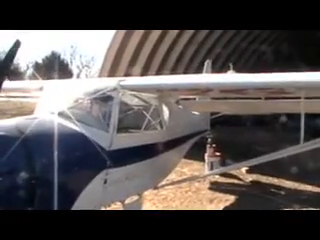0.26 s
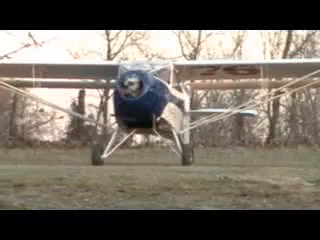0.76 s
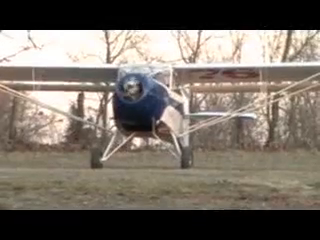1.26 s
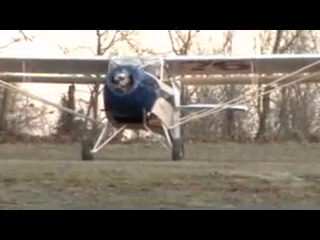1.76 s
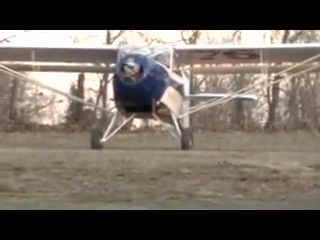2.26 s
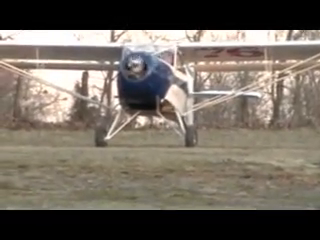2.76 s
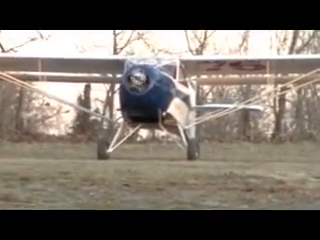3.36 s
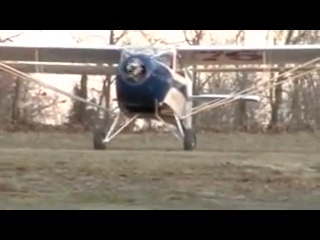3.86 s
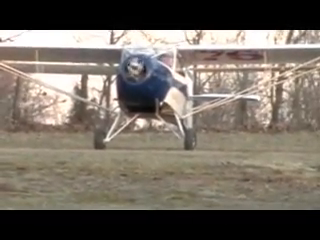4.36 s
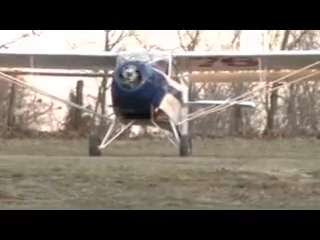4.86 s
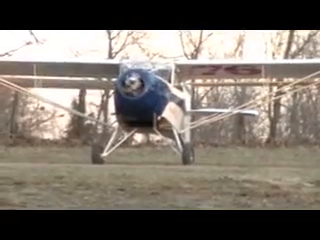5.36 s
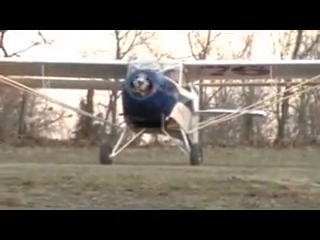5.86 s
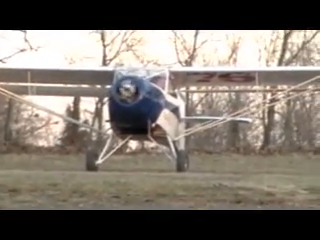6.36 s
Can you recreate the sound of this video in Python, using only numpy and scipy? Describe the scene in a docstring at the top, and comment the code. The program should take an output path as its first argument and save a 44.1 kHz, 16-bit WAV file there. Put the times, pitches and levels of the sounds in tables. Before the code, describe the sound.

Stereo outdoor sound on a grass strip. First under a second of quiet, low engine rumble and two small handling clicks. It cuts to nothing for an instant, then a loud, steady propeller drone begins abruptly, rough and throbbing, with gritty valve clatter and rushing air. The pitch eases down early, stays level, and rises slightly toward the end while a lower second drone sinks.

```python
"""Light aircraft on a grass strip

First an engine idles softly farther off in an open field, with two small clicks close by. After a moment of
silence the aircraft is heard head-on and much louder: it eases back, then slowly picks up. Four-cylinder firing
and a geared three-blade propeller are sums of harmonics of one crankshaft; torn air and valve clatter are gated
noise, the gears whine as tones, panels and a whistle sing as narrow noise, and a second drone holds its pitch,
fades once, returns and sinks."""
import sys
import numpy as np
from scipy import signal
from scipy.fft import rfft, irfft, next_fast_len
from scipy.io import wavfile
from scipy.ndimage import uniform_filter1d

SR = 44100
rng = np.random.default_rng(int(sys.argv[2]) if len(sys.argv) > 2 else 0)


def store_wav(level_fs):
    """Save 16-bit WAV to argv[1]."""
    pcm = np.round(np.clip(np.atleast_2d(level_fs), -1, 1) * 32767)
    wavfile.write(sys.argv[1], SR, pcm.T.astype(np.int16))


N = 291942
T = np.arange(N) / SR   # s
IDLE_END_S, RUN_START_S = .786, .811
# "cycle" counts four-stroke engine cycles; "rev" is the speed above the usual one, in cycles per s
USUAL_CYCLE_HZ = 16.5
BLADES_PER_CYCLE = 2.64   # blade passes in one engine cycle

# left-right likeness of the aircraft's noise: f/Hz, likeness (1 = the same in both ears)
AIRCRAFT_LIKENESS = [(60, .96), (430, .96), (540, .77), (900, .8), (1050, .94), (1500, .97), (2050, .92),
                     (2350, .73), (3000, .93), (4100, .82), (4800, .89), (5600, .8), (6400, .92),
                     (7500, .86), (11000, .82)]
# left-right likeness of the surroundings: f/Hz, likeness (1 = the same in both ears)
FIELD_LIKENESS = [(60, .8), (270, 0.5), (570, 0.25), (1200, 0.0058), (2500, 0), (6000, 0.17)]


def from_db(db):
    """Decibels to gain."""
    return 10 ** (np.asarray(db) / 20)


def rms_one(x):
    """Scale to unit rms."""
    return x / np.sqrt(np.mean(x ** 2) + 1e-20)


def in_time(rows):
    """Read a two-column curve sample by sample."""
    s, values = np.transpose(rows)
    return np.interp(T, s, values)


def at_hz(points, hz):
    """Read a table on a log-frequency axis."""
    points = np.array(points)
    return np.interp(np.log(hz + 1e-9), np.log(points[:, 0]), points[:, 1])


def since(s):
    """Seconds gone by since a moment, zero before it."""
    return np.maximum(T - s, 0)


def drift(rate):
    """Smooth chance with spread 1, changing about rate times a second."""
    step = 100   # samples between the slow points
    r = np.exp(-2 * np.pi * rate * step / SR)
    chance = rng.standard_normal(N // step + 1002)
    slow = signal.lfilter([1], [1, -2 * r, r * r], chance)[1000:]   # skip the filter's start
    return np.interp(np.arange(N) / step, np.arange(len(slow)), rms_one(slow))


def colour(x, gain_at):
    """Filter by a gain that is a function of frequency."""
    size = next_fast_len(N + SR // 10)
    hz = np.arange(size // 2 + 1) * SR / size
    return irfft(rfft(x, size) * gain_at(hz), size)[..., :N]


def air_noise(spectrum, gate=1, likeness=AIRCRAFT_LIKENESS):
    """Gated stereo turbulence with a given colour; rms 1."""
    mid, side = rng.standard_normal((2, N)) * gate
    alike = lambda hz: np.clip(at_hz(likeness, hz), 0, 1)
    mid = colour(mid, lambda hz: from_db(at_hz(spectrum, hz)) * np.sqrt(1 + alike(hz)))
    side = colour(side, lambda hz: from_db(at_hz(spectrum, hz)) * np.sqrt(1 - alike(hz)))
    return rms_one(np.array([mid + side, mid - side]))


def tone(turns, db, rough):
    """One partial near a given rms level; it flutters, and slowly fades and swells as its ground echo shifts."""
    angle = 2 * np.pi * turns
    level = np.sqrt(2) * from_db(db + .38 * drift(.75))
    in_phase = 1 + rough * drift(10.2)
    return level * (in_phase * np.cos(angle) + rough * drift(10.3) * np.sin(angle))


def singing(turns, db, width_hz):
    """A resonance fed by turbulence: a pitch with no steady phase."""
    angle = 2 * np.pi * turns
    return from_db(db) * (drift(width_hz) * np.cos(angle) + drift(width_hz) * np.sin(angle))


def resonance(x, hz, width_hz):
    """A two-pole band-pass with gain 1 on top."""
    r = np.exp(-np.pi * width_hz / SR)
    feedback = [1, -2 * r * np.cos(2 * np.pi * hz / SR), r * r]
    return signal.lfilter(np.array([1, 0, -1]) * (1 - r * r) / 2, feedback, x)


def field_hush():
    """Open-air hush as coloured noise whose treble brightens, with narrow bands stirring unevenly in it."""
    # colour of the hush: f/Hz, relative level/dB per Hz
    hush_colour = [(190, -33), (330, -3.5), (411, -3), (462, -9), (543, -5), (1020, -6.5), (1290, -7),
                   (3020, -20), (7850, -24.5), (9360, -26), (11000, -41), (14300, -77), (22000, -120)]
    # faint stirrings: f/Hz, middle level/dB rms
    stirrings = [(560, -73), (820, -75.5), (1270, -78)]
    rises_at_s, rise_s, rise_db, edge_hz = .45, .1, 8.5, 8100
    hush = air_noise(hush_colour, from_db(.6 * drift(12)), FIELD_LIKENESS)
    rise = np.clip(since(rises_at_s) / rise_s, 0, 1)
    treble = colour(hush, lambda hz: hz ** 2 / (hz ** 2 + edge_hz ** 2))
    hush = hush + (from_db(rise_db * rise) - 1) * treble
    stirs = sum(singing(hz * T, db + 3 * drift(7), width_hz=90) for hz, db in stirrings)
    return from_db(-58.5) * hush + stirs


def clicks():
    """A short scrape and a snap ring a small, well damped body and give it a soft thump."""
    # clicks: t/s, scrape drive/dB, snap drive/dB, rise/s, decay/s, contact top f/Hz,
    # body f/Hz, relative body level/dB, thump drive/dB
    click_rows = [(0.1955, -43, -43, 0.0073, 0.003, 4200, 1540, 4.5, -46),
                  (0.5732, -37, -18, 0.0013, 0.004, 8800, 1150, 9.5, -32)]
    # upper body modes: f/Hz, width/Hz, relative level/dB
    upper_modes = [(2330, 280, -1), (3050, 280, 0), (4100, 400, -4), (4870, 520, -3), (6340, 540, -4),
                   (7700, 600, -3), (8600, 540, -8)]
    thump_s, contact_low_hz, body_width_hz = .001, 750, 250
    out = np.zeros(N)
    for s, scrape_db, snap_db, rise, decay, top_hz, body_hz, body_db, thump_db in click_rows:
        envelope = np.exp(-np.maximum((s - T) / rise, (T - s) / decay))
        contact = from_db(scrape_db) * envelope * rng.standard_normal(N)
        contact[int(s * SR)] += from_db(snap_db)
        band = signal.butter(2, [contact_low_hz, top_hz], "band", fs=SR, output="sos")
        contact = signal.sosfilt(band, contact)
        modes = [(body_hz, body_width_hz, body_db), *upper_modes]
        for k, (hz, width, db) in enumerate(modes):
            out += 2 * (-1) ** k * from_db(db) * resonance(contact, hz, width)   # alternating signs
        push = (T - s) / thump_s
        out -= from_db(thump_db) * push * np.exp(-push ** 2 / 2)
    return out


def harmonics(cycle, orders, rough, scatter):
    """Every fourth harmonic lines up into firing pulses; unequal cylinders fill in the lines between them."""
    firing_smear = .13   # turns by which the pipes pull the firing harmonics out of step
    total = 0
    for k, db in orders:
        spread = scatter if k % 4 else firing_smear
        total = total + tone(k * cycle + spread * rng.normal(), db, rough)
    return total


def soft_idle():
    """The muffled idle: weak firing harmonics, a low hum beside them and an unevenly surging rumble."""
    # idle tones: multiple of the cycle rate, level/dB rms
    idle_tones = [(4, -61), (6, -63), (7, -72), (8, -68), (9, -67), (10, -50), (11, -62), (12, -57),
                  (14, -64.5), (16, -65.5), (18, -77), (20, -74)]
    # low hum: multiple of its base pitch, level/dB rms
    hum_tones = [(2, -55), (3, -67), (4, -75)]
    # colour of the rumble: f/Hz, relative level/dB per Hz
    rumble_colour = [(25, -20), (50, -11), (80, -7), (130, -5), (165, 8), (200, 1), (260, -5), (380, -8.5),
                     (470, -10), (620, -47)]
    cycle_hz, hum_hz = 17.3, 41.3
    cycle = np.cumsum(cycle_hz * (1 + .0013 * drift(4.6))) / SR
    firing = harmonics(cycle, idle_tones, rough=.17, scatter=.33)
    hum = harmonics(hum_hz * T, hum_tones, rough=.16, scatter=.3)
    rumble = air_noise(rumble_colour, from_db(2.2 * drift(12)), FIELD_LIKENESS)
    return firing + hum + from_db(-56) * rumble


def second_drone():
    """A low drone with two faint partners beside the engine, fading midway, then returning and sinking."""
    # partners: pitch ratio to the drone, level against it/dB
    partners = [(.625, -16), (2, -17)]
    drone_hz, drone_db = 118.86, -41.5
    sinks_at_s, sag_hz_per_s = 4.55, 3.53
    fade_at_s, fade_width_s, fade_db = 3.52, .3, 10
    turns = np.cumsum(drone_hz - sag_hz_per_s * since(sinks_at_s)) / SR
    fade = fade_db * np.exp(-((T - fade_at_s) / fade_width_s) ** 2)
    main = tone(turns, drone_db - fade, rough=.15)   # the partners do not fade with it
    return main + sum(tone(ratio * turns, drone_db + less, rough=.13) for ratio, less in partners)


def clatter(cycle, hiss_swell_db):
    """A gritty metallic tick once in each engine cycle, like a loose valve: noise in decaying bursts."""
    # colour of the ticks: f/Hz, relative level/dB per Hz
    tick_colour = [(1900, -41), (2500, -5.5), (2850, 1.5), (3050, 0.5), (3400, -6), (3800, -21),
                   (6000, -27.5), (10000, -42.5)]
    decay_cycles = .25
    gate = np.exp(-(cycle % 1) / decay_cycles) * from_db(3 * drift(150))
    return from_db(-61.5 + 2 * hiss_swell_db) * air_noise(tick_colour, gate)


def gear_whine(cycle):
    """The tooth-meshing tone wobbles with the blades and sags, as does a coarse buzz above it."""
    # mesh and side tones: blade rates away from the mesh tone, level against the whine/dB
    mesh_tones = [(-1, -9), (0, 1.8), (1, -8.5), (2, -3.5), (4, -8)]
    mesh_order, buzz_order = 88, 95   # multiples of the cycle rate
    whine_db = -47 - 3.5 * since(RUN_START_S)   # sags 3.5 dB per s
    mesh = 0
    for step, db in mesh_tones:
        mesh = mesh + tone((mesh_order + step * BLADES_PER_CYCLE) * cycle, whine_db + db, rough=.25)
    return mesh + singing(buzz_order * cycle, whine_db - 2.5, width_hz=120)


def high_gear(cycle):
    """A higher gear tone swells once and fades as the engine settles."""
    order, peak_db, peak_at_s = 104, -50, 2.15
    fall_s = .5   # time from the peak to 1 dB below it
    return tone(order * cycle, peak_db - ((T - peak_at_s) / fall_s) ** 2, rough=.3)


def panels():
    """Panels that the engine keeps ringing, each a narrow band of noise at a fixed pitch."""
    # panels: f/Hz, width/Hz, level/dB rms
    panel_modes = [(1430, 21, -50), (1695, 45, -56.5), (2033, 22, -56.5), (4316, 41, -70)]
    return sum(singing(hz * T, db, width) for hz, width, db in panel_modes)


def whistle(rev, hiss_swell_db):
    """A breathy whistle that rises in pitch with speed and swells with the hiss."""
    whistle_hz = 2956 + 109.6 * rev
    return singing(np.cumsum(whistle_hz) / SR, -54.5 + 1.7 * hiss_swell_db, width_hz=92)


def throb(cycle, blade_db, uneven_db, cycle_db, firing_db, flutter_db, grain_db):
    """Gain that swells with three unequal blades, each engine cycle and each firing, and flutters by chance."""
    beat = lambda turns: np.cos(2 * np.pi * turns)
    blade = BLADES_PER_CYCLE * cycle
    shaft = blade / 3
    uneven = beat(shaft) + beat(2 * shaft) + .7 * beat(5 * shaft)
    propeller_db = blade_db * beat(blade) + uneven_db * uneven
    engine_db = cycle_db * beat(cycle) + firing_db * beat(4 * cycle)
    return from_db(propeller_db + engine_db + flutter_db * drift(25) + grain_db * drift(190))


def torn_air(cycle, rev, treble_db, hiss_swell_db):
    """Air torn by the blades: rumble, low roar, rasp and hiss, all noise throbbing with the propeller."""
    # noise colours, each: f/Hz, relative level/dB per Hz
    rumble_colour = [(20, -30), (35, -15), (50, -11), (90, -7.5), (170, 0.5), (300, 0), (372, 0),
                     (402, -7.5), (450, -5.5), (520, -11.5), (700, -18.5), (1000, -50)]
    roar_colour = [(450, -37), (580, -14), (700, -5), (900, -1), (980, 0.5), (1120, -1.5), (1300, -1),
                   (1800, -44)]
    rasp_colour = [(310, -28.5), (540, -18.5), (720, -12), (910, -18), (990, -7.5), (1180, -5.5),
                   (1450, -0.5), (1750, -2.5), (2070, -7), (2290, -15.5), (2600, -14), (2950, -12.5),
                   (3350, -18), (3800, -22), (4900, -55), (8000, -100)]
    hiss_colour = [(2000, -14.5), (3400, -2.5), (4040, -5), (4870, -3.5), (5580, -9), (6600, -4.5),
                   (7170, -10), (10000, -17.5), (10600, -25), (11000, -55), (14300, -64), (22000, -120)]
    blade_beat = np.cos(2 * np.pi * BLADES_PER_CYCLE * cycle)
    rumble = from_db(-45.5) * air_noise(rumble_colour, from_db(2 * blade_beat))
    chop = throb(cycle, blade_db=1.3, uneven_db=.55, cycle_db=.4, firing_db=.9,
                 flutter_db=.4, grain_db=.9)
    roar = from_db(-46.5 - .5 * rev) * air_noise(roar_colour, chop)
    rasp = from_db(-37.5 + rev) * air_noise(rasp_colour, chop)
    edge_hz = 1660   # above this pitch the rasp swells and fades with the hiss
    edge = colour(rasp, lambda hz: 1 - 1 / (1 + (hz / edge_hz) ** 8))
    rasp = (rasp - edge) + from_db(.43 * hiss_swell_db) * edge
    fine_chop = throb(cycle, blade_db=.54, uneven_db=-.25, cycle_db=.16, firing_db=-.3,
                      flutter_db=.5, grain_db=1.44)
    hiss = from_db(treble_db + .87) * air_noise(hiss_colour, fine_chop)
    return rumble + roar + rasp + hiss


def blade_load():
    """Load on the blades in dB: it builds up as the throttle opens, then eases a little."""
    full_db, full_at_s, builds_db_per_s, eases_db_per_s = 1.6, 4.1, 4.5, .4
    missing_db = builds_db_per_s * np.maximum(full_at_s - T, 0)
    return full_db - missing_db - eases_db_per_s * since(full_at_s)


def chopped_exhaust(cycle, load_db):
    """The blades chop a strong exhaust tone into side tones, which beat slowly against the propeller's own."""
    # side tones: blade rates away from the chopped tone, level at zero load/dB rms
    side_tones = [(-1, -54), (1, -53.5), (2, -56)]
    chopped_order, load_share = 16, .5
    total = 0
    for step, db in side_tones:
        turns = (chopped_order + step * BLADES_PER_CYCLE) * cycle
        total = total + tone(turns, db + load_share * load_db, rough=.12)
    return total


def propeller(cycle, load_db, rev):
    """Each passing blade slaps the air; gusts shift timing and strength, load and speed set the tone levels."""
    # blade tones: multiple of the blade rate, level at zero load and usual speed/dB rms,
    # share of the load's swing, level slope/dB per rev
    blade_tones = [(2, -58, 0, 4.5), (3, -49.5, 0.023, 3.5), (4, -48.5, 0.41, 5.5), (5, -44.8, 0.58, 2.5),
                   (6, -45, 1, 2), (7, -46.5, 1, 3.5), (8, -48, .8, 3.5), (9, -60, 0.24, 6),
                   (10, -57, .35, -1.5), (11, -64, .3, -5.5), (12, -68, 0.089, 3.5)]
    blade = BLADES_PER_CYCLE * cycle + .006 * drift(9)   # timing gusts, in blade passes
    slaps = 0
    for k, db, share, db_per_rev in blade_tones:
        level_db = db + share * load_db + db_per_rev * rev
        slaps = slaps + tone(k * blade + .11 * rng.normal(), level_db, rough=.12)
    return slaps * from_db(.4 * drift(14))   # strength gusts, in dB


def exhaust(cycle, rev):
    """Firing harmonics of four cylinders, shaped by the resonances of the tailpipe."""
    # firing tones: multiple of the cycle rate, level ahead of the pipe/dB rms
    firing_tones = [(4, -44), (5, -63), (6, -62), (7, -55), (8, -42), (10, -49), (11, -53.5), (12, -45.5),
                    (13, -50), (14, -44.5), (15, -56), (16, -44), (17, -63), (18, -50.5), (19, -60),
                    (21, -56), (22, -59), (23, -60), (24, -66), (26, -60), (27, -71), (29, -62)]
    # tailpipe response: f/Hz, gain/dB
    pipe = [(130, 0), (160, -2), (177, 6), (198, 3), (225, 0.5), (258, 1.5), (272, -3.5), (288, -1),
            (330, -4.5), (375, 0), (450, 0), (475, 0.5), (505, -11)]
    firing = harmonics(cycle, firing_tones, rough=.07, scatter=.27)
    return from_db(-.5 - .5 * rev) * colour(firing, lambda hz: from_db(at_hz(pipe, hz)))


def head_on():
    """Exhaust, propeller, gears and torn air all follow the one crankshaft."""
    # engine speed: t/s, four-stroke cycle rate f/Hz before a slight unsteadiness
    speed = [(0.81, 17.95), (1.25, 17.64), (1.95, 16.38), (2.4, 16.32), (2.75, 16.18), (4.5, 16.22),
             (5.7, 16.71), (6.05, 16.73), (6.62, 16.87)]
    # course of the treble hiss: t/s, level before trim/dB
    treble = [(0.83, -50), (1.67, -53), (2.72, -53), (4.65, -57), (6.36, -52), (6.6, -52)]
    cycle_hz = in_time(speed)
    rev = cycle_hz - USUAL_CYCLE_HZ
    cycle = np.cumsum(cycle_hz * (1 + .0012 * drift(5))) / SR
    treble_db = in_time(treble)
    swell_db = treble_db - treble_db.mean()
    load_db = blade_load()
    whines = gear_whine(cycle) + high_gear(cycle) + panels() + whistle(rev, swell_db)
    air = torn_air(cycle, rev, treble_db, swell_db)
    thrum = propeller(cycle, load_db, rev) + chopped_exhaust(cycle, load_db)
    return clatter(cycle, swell_db) + whines + air + thrum + exhaust(cycle, rev)


def scene():
    """The soft idle, a moment of silence, then the aircraft head-on."""
    before = np.clip((IDLE_END_S - T) / .004, 0, 1)
    after = np.clip((T - RUN_START_S) / .002, 0, 1)
    return before * (field_hush() + clicks() + soft_idle()) + after * (second_drone() + head_on())


def record(dry):
    """The two microphones differ a little in colour and phase; the top is cut."""
    # level balance: f/Hz, left minus right/dB
    balance = [(60, -2.5), (140, -2), (300, -.3), (450, 1.1), (780, 2.3), (1100, 1.3), (1950, 2),
               (3400, .7), (4400, .6), (5500, -.8), (10000, .3)]
    # phase lead of the left: f/Hz, lead/radians
    lead = [(65, -.11), (115, .08), (200, .17), (260, .29), (450, .25), (620, .38), (850, .32), (970, .02),
            (1900, .03), (2400, -.15), (3800, -.09), (4600, -.22), (7500, .05), (11000, .05)]
    half = np.array([[.5], [-.5]])   # each side takes half of the difference
    heard = colour(dry, lambda hz: from_db(at_hz(balance, hz) * half) * np.exp(1j * at_hz(lead, hz) * half))
    top_cut = signal.ellip(10, .2, 80, 10900, fs=SR, output="sos")   # low-pass at 10.9 kHz
    return signal.sosfilt(top_cut, heard)


dry = scene()
out = record(dry)
store_wav(out)
```